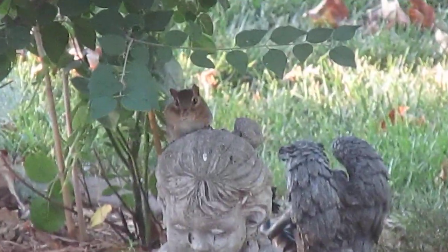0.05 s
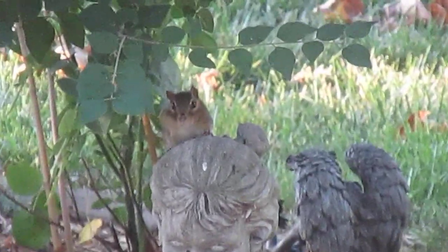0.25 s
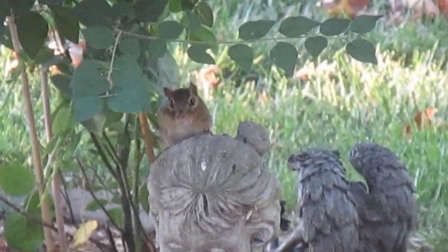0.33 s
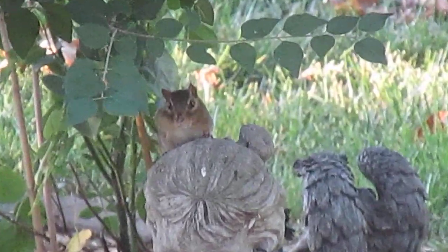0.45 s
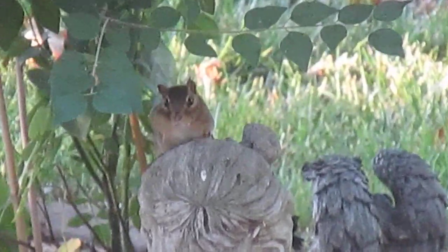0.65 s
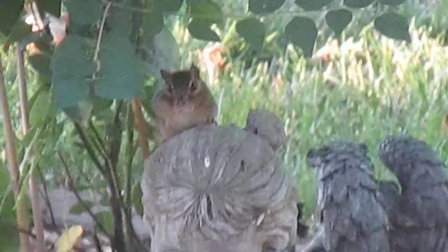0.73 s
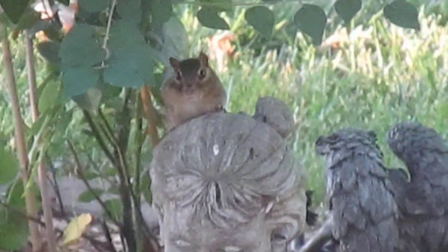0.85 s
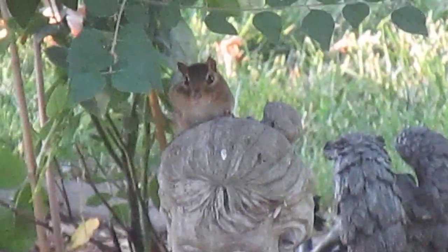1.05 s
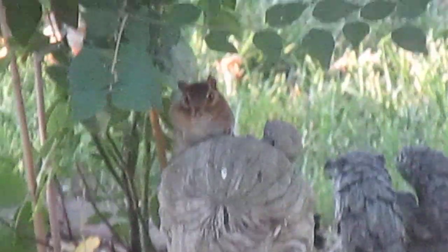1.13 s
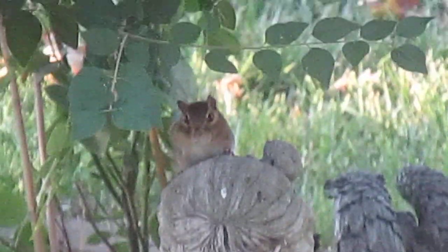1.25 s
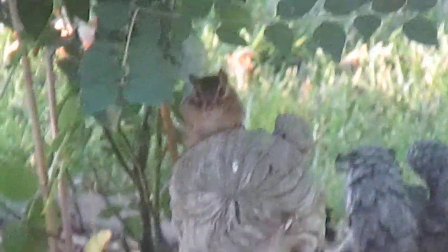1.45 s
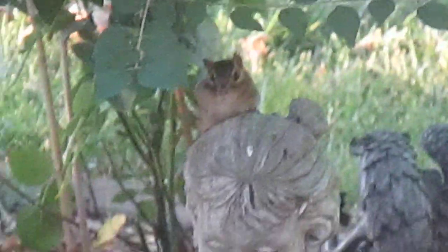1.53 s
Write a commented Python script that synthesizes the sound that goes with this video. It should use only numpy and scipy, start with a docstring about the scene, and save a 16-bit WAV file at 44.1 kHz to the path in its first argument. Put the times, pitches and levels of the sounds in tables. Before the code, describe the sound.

A single plastic knock against the camera, over soft garden hiss and thin chirps.

```python
"""A quiet garden: distant rumble, machine hum, thin hiss, far insects. A far bird's harsh call fades.
One knock, right at the microphone, cracks and rings the camera's plastic shell.
The gain control ducks, then slowly lets the background back in.
Small animals chirp thinly in echoing foliage; fingers tick faintly on the camera."""
import sys
import numpy as np
from scipy import signal
from scipy.fft import rfft, irfft, next_fast_len
from scipy.io import wavfile
from scipy.ndimage import uniform_filter1d, minimum_filter1d, map_coordinates

SR = 44100
rng = np.random.default_rng(int(sys.argv[2]) if len(sys.argv) > 2 else 0)


def wav_out(sig):
    """Save sig, one row per channel (or a flat mono array), as 16-bit PCM at SR to the path in sys.argv[1]."""
    wavfile.write(sys.argv[1], SR, np.round(np.clip(np.atleast_2d(sig).T, -1, 1) * 32767).astype(np.int16))


N = 70560

# Stereo likeness of noise. Each row: frequency in Hz, left-right correlation.
CORRELATION = [(60, .75), (300, .72), (640, .45), (1400, 0.26), (3000, 0.022)]
# Noise spectra. Each row: frequency in Hz, relative density in dB.
RUMBLE_SPECTRUM = [(25, -15), (45, -1.5), (80, 0.5), (150, -2), (250, 1), (450, -2.5), (800, -5),
                   (1400, -10), (2200, -20.5), (4000, -30.5), (10000, -48)]
HISS_SPECTRUM = [(500, -8.5), (2500, -3), (4000, 0), (5800, 3), (7200, -1), (8500, -4.5), (10500, -11),
                 (13000, -6.5), (16000, -10.5)]
INSECT_SPECTRUM = [(2500, -50.5), (4200, -22), (4650, -3), (5000, 1), (5400, -9.5), (6500, -26),
                   (9000, -50.5)]
CRACK_SPECTRUM = [(60, -24), (300, -11), (800, -5), (1500, 1), (3000, 0.5), (8000, 5), (10000, -8.5),
                  (15000, 0.5)]
REFLECTION_SPECTRUM = [(100, -14), (500, 6), (1200, -3), (3000, -2.5), (6000, 1.5), (10000, -7.5),
                       (15000, -5)]
TICK_SPECTRUM = [(200, -6), (800, 20), (1800, 6), (4000, -0.5), (8500, 3), (11000, -12), (15000, -18)]
# Machine tones. Each row: frequency in Hz, level in dB.
HUM_TONES = [(121, -70.5), (161.5, -63.5), (204, -69.5), (242.2, -63), (323, -71.5), (360.7, -63.5),
             (619, -73)]
# Bird call. Each row: frequency in Hz, width in Hz, level in dB, fade in dB/s, left over right in dB.
CALL_PARTIALS = [(1497, 82, -65, 55.5, -5.5), (2323, 160, -57.5, 38, -3), (2885, 100, -55.5, 56, -2.5),
                 (3234, 100, -57.5, 64, -7), (4756, 280, -58.5, 149, 10.5), (5710, 320, -58, 41, 5),
                 (6250, 99, -62, 76, 3.5)]
# Graze, first touch, blow, rebound. Each row: start in seconds, ring and crack in dB re the blow.
KNOCK_CONTACTS = [(0.2185, -36, -31), (0.2214, -17, -9.5), (0.2225, 0, 0), (0.2246, -17.5, -10)]
# Shell resonances. Each row: frequency in Hz, left and right relative levels in dB, T60 in seconds.
SHELL_MODES = [(940, -17.5, -18, 0.012), (1480, -15, 1, 0.0074), (1887, -0.5, -17, 0.012),
               (2350, -16.5, -14.5, .009), (3035, 3, -6, .009), (3477, -20.5, -4, 0.0097),
               (4773, 1, -13, 0.0058), (5090, -3, -8.5, .01), (6055, -9, -9.5, .008),
               (6663, -12, -13, 0.005), (7200, -6.5, -12.5, 0.0099), (8800, 1, 3.5, 0.0065),
               (9480, -19, -5.5, .008), (11500, -12, -6.5, 0.012), (13180, -6.5, -3, 0.012),
               (13400, -4, -5, 0.0047), (14250, -2.5, 8.5, 0.0038), (15700, -15.5, -7, 0.0042)]
# Animal chirps. Each row: start and length in seconds, start and end pitch in Hz, level in dB,
# left over right in dB, echo re the note in dB.
CHIRP_NOTES = [(0.607, 0.0221, 5810, 6930, -56, 5.5, 0.5), (0.943, 0.0382, 6550, 7310, -68, 9, 10),
               (1.092, 0.024, 5450, 5900, -64, 8.5, 3), (1.182, 0.029, 4720, 4500, -69, 12, -4),
               (1.511, 0.02, 5590, 6340, -54, 11.5, -2.5), (1.517, 0.013, 6290, 7450, -59, 11.5, 8)]
# Finger touches. Each row: start in seconds, level in dB, tilt in dB/octave.
FINGER_TOUCHES = [(0.740, -44.5, -1.5), (0.949, -56.5, 3.5), (1.110, -68, -0.5), (1.350, -54.5, 1.5),
                  (1.482, -47, -1.5)]

TOP_HZ = 15900


def amp(db):
    """Decibels to gain."""
    return 10 ** (np.asarray(db) / 20)


def unit(x):
    """Scale to rms 1."""
    return x / np.sqrt(np.mean(x ** 2) + 1e-20)


def since(start_s):
    """Seconds since the start, zero before it."""
    return np.maximum(np.arange(N) / SR - start_s, 0)


def pan(left_db):
    """Channel gains for a left-over-right level."""
    return amp([[left_db / 2], [-left_db / 2]])


def along(points, hz):
    """Interpolate (Hz, value) points on a log axis."""
    knots_hz, values = np.transpose(points)
    return np.interp(np.log(hz + 1), np.log(knots_hz + 1), values)


def wobble(rate_hz):
    """Smooth curve through random knots."""
    return map_coordinates(rng.standard_normal(N // 8), [np.arange(N) * rate_hz / SR], mode="wrap")


def filtered(x, response):
    """Zero-phase filter; response maps Hz to gain."""
    size = next_fast_len(N + SR // 2)
    return irfft(rfft(x, size) * response(np.fft.rfftfreq(size, 1 / SR)), size)[..., :N]


def noise(spectrum):
    """Stereo noise of rms 1, alike in the bass, unrelated in the treble."""
    def mid_side_gains(hz):
        angle = np.arccos(np.clip(along(CORRELATION, hz), -1, 1)) / 2
        return amp(along(spectrum, hz)) * [np.cos(angle), np.sin(angle)]
    mid, side = filtered(rng.standard_normal((2, N)), mid_side_gains)
    return unit(np.array([mid + side, mid - side]))


def tone(hz):
    """Sine of rms 1 on a pitch curve."""
    return np.sqrt(2) * np.sin(2 * np.pi * (np.cumsum(hz) / SR + rng.random()))


def decay(start_s, t60_s):
    """Instant onset, exponential fall."""
    t = since(start_s)
    return (t > 0) * np.exp(-np.log(1000) * t / t60_s)


def rumble():
    """Distant low noise, level wavering slightly."""
    return amp(-51.5 + 0.74 * wobble(rate_hz=8)) * noise(RUMBLE_SPECTRUM)


def hiss():
    """Thin, near-steady high noise."""
    return amp(-61.5 + 0.25 * wobble(rate_hz=36)) * pan(left_db=1.5) * noise(HISS_SPECTRUM)


def machine_hum(swing_db=3.5, drift_hz=2):
    """Distant machine; each tone wavers in level and pitch."""
    return sum(amp(db + swing_db * wobble(rate_hz=5.9)) * tone(hz + drift_hz * wobble(rate_hz=9))
               for hz, db in HUM_TONES)


def insects():
    """Far chorus: a narrow noise band near 5 kHz."""
    return amp(-69 + 0.94 * wobble(rate_hz=16)) * pan(left_db=7.5) * noise(INSECT_SPECTRUM)


def bird_call(peak_s=0.015, rise_db_per_s=116, sag_per_s=0.1):
    """End of a harsh call: partials sag and fade, smeared by distance."""
    t, out = since(0), np.zeros((2, N))
    rise_db = rise_db_per_s * np.minimum(t - peak_s, 0)
    for hz, width_hz, db, fade_db_per_s, left_db in CALL_PARTIALS:
        pitch_hz = hz * (1 - sag_per_s * t)
        smeared = [unit(wobble(2 * width_hz) * tone(pitch_hz + width_hz / 2 * wobble(width_hz)))
                   for _ in range(2)]
        envelope = amp(db + rise_db - fade_db_per_s * since(peak_s))
        out += envelope * pan(left_db) * np.array(smeared)
    return out


def shell_ring(start_s, attack_s=0.00011, treble_delay_s=0.00028, port_lag_s=0.00016):
    """Shell modes at both microphone ports; high modes arrive later, the left port lags."""
    out = np.zeros((2, N))
    for k, (hz, left_db, right_db, t60_s) in enumerate(SHELL_MODES):
        arrival_s = start_s + treble_delay_s * hz / TOP_HZ
        t = np.array([since(arrival_s + port_lag_s / 2), since(arrival_s - port_lag_s / 2)])
        envelope = (1 - np.exp(-t / attack_s)) * np.exp(-np.log(1000) * t / t60_s)
        out += (-1) ** k * amp([[left_db], [right_db]]) * envelope * np.sin(2 * np.pi * hz * t)
    return out


def knock():
    """Each contact cracks and rings the shell; near surfaces and far foliage reflect it."""
    def envelope(t60_s):
        return np.sqrt(sum((amp(crack_db) * decay(start_s, t60_s)) ** 2
                           for start_s, _, crack_db in KNOCK_CONTACTS))
    ring = amp(2) * sum(amp(ring_db) * shell_ring(start_s) for start_s, ring_db, _ in KNOCK_CONTACTS)
    crack = amp(4.5) * envelope(t60_s=0.013) * noise(CRACK_SPECTRUM)
    near = amp(-24.5) * envelope(t60_s=0.073)
    far = amp(-47) * envelope(t60_s=0.3)
    return ring + crack + (near + far) * noise(REFLECTION_SPECTRUM)


def chirps(rough_hz=293, foliage_t60_s=0.58):
    """Small animals whistle short, slightly rough glides; foliage scatters each."""
    out = np.zeros((2, N))
    for start_s, length_s, start_hz, end_hz, db, left_db, echo_db in CHIRP_NOTES:
        progress = np.minimum(since(start_s) / length_s, 1)
        glide_hz = end_hz + (start_hz - end_hz) * (1 - progress) ** 1.82  # quick, then levels off
        envelope = np.sqrt(np.abs(np.sin(np.pi * progress)))
        note = envelope * tone(glide_hz + rough_hz * wobble(rate_hz=900))
        foliage = unit(rng.standard_normal((2, N)) * decay(0, foliage_t60_s)) / np.sqrt(N)
        echo = signal.fftconvolve(note[None], foliage, axes=1)[:, :N]
        out += amp(db) * pan(left_db) * (note + amp(echo_db) * echo)
    return out


def finger_ticks(t60_s=0.047):
    """Fingers shift softly on the camera, some touches dull, some bright."""
    out = np.zeros((2, N))
    for start_s, db, tilt_db_per_octave in FINGER_TOUCHES:
        spectrum = [(hz, band_db + tilt_db_per_octave * np.log2(hz)) for hz, band_db in TICK_SPECTRUM]
        out += amp(db) * decay(start_s, t60_s) * noise(spectrum)
    return out


def scene():
    """Stereo sum at the microphone."""
    background = rumble() + hiss() + machine_hum() + insects()
    return background + bird_call() + knock() + chirps() + finger_ticks()


def auto_gain(dry, threshold_db=-6, range_db=10.5, hold_s=0.23, release_s=0.35, ahead_s=0.003):
    """Gain curve: ducks just ahead of a peak, holds, recovers slowly."""
    peak_db = 20 * np.log10(np.abs(dry).max(axis=0) + 1e-9)
    over_db = np.clip(peak_db - threshold_db, 0, range_db)
    release = np.exp(since(0) / release_s)
    duck_db = np.maximum.accumulate(over_db * release) / release
    hold, ahead = int(hold_s * SR) // 2 * 2 + 1, int(ahead_s * SR)
    held_db = minimum_filter1d(-duck_db, hold, origin=hold // 2, mode="nearest")
    return amp(uniform_filter1d(minimum_filter1d(held_db, ahead), ahead))


def record(dry):
    """Gain control, full-scale clipping, steep low-pass."""
    clipped = np.clip(dry * auto_gain(dry), -1, 1)
    return filtered(clipped, lambda hz: 1 / (1 + (hz / TOP_HZ) ** 110))


dry = scene()
out = record(dry)
wav_out(out)
```